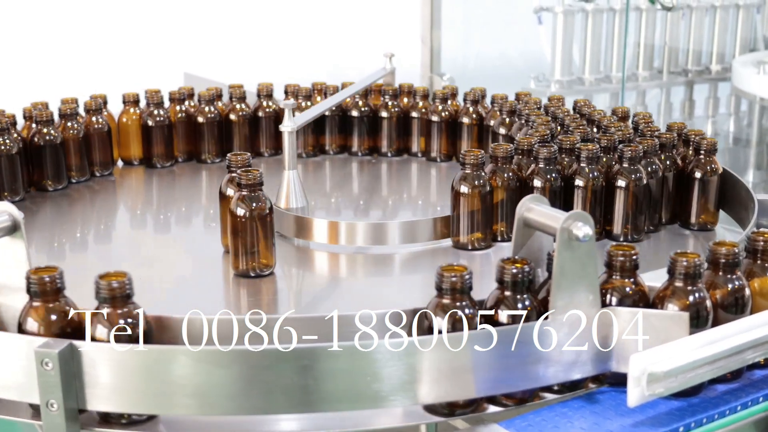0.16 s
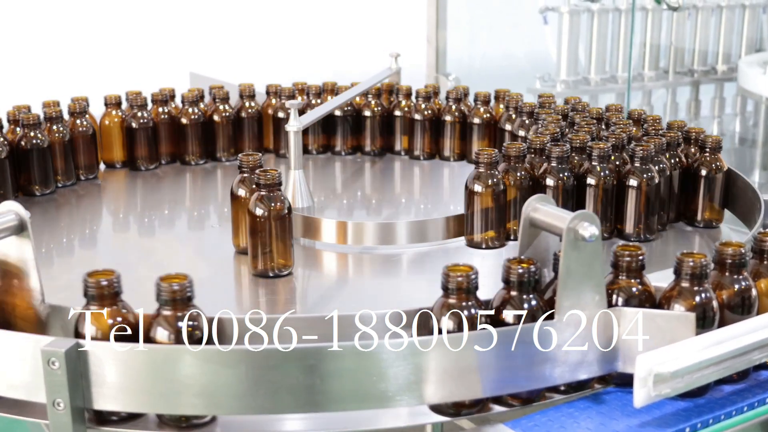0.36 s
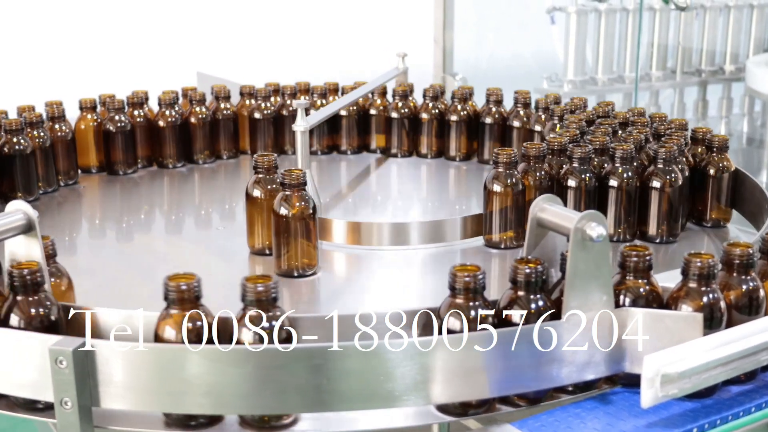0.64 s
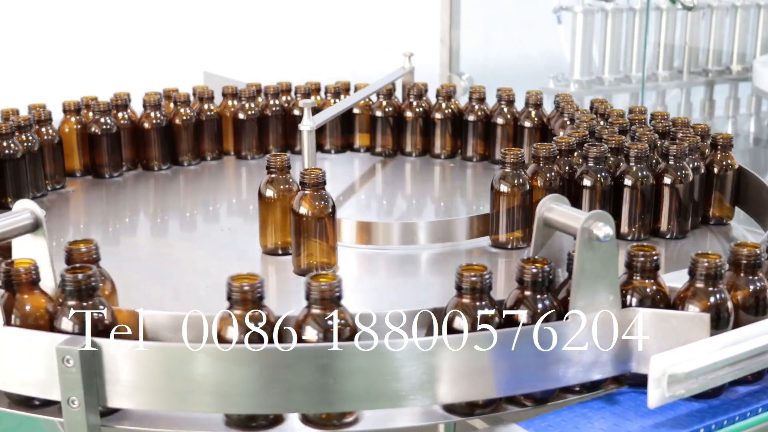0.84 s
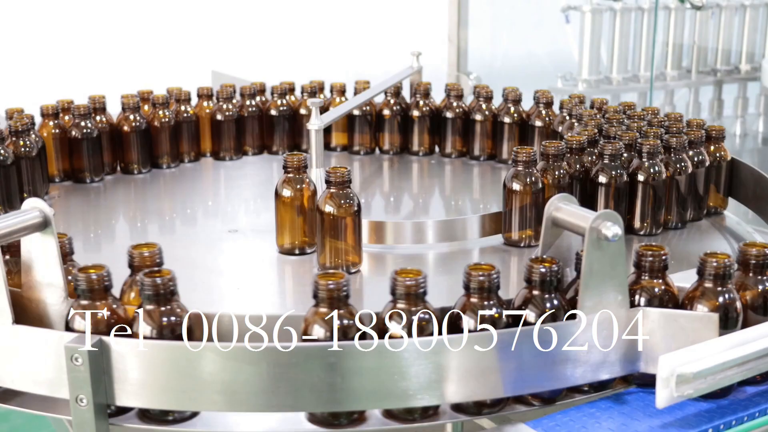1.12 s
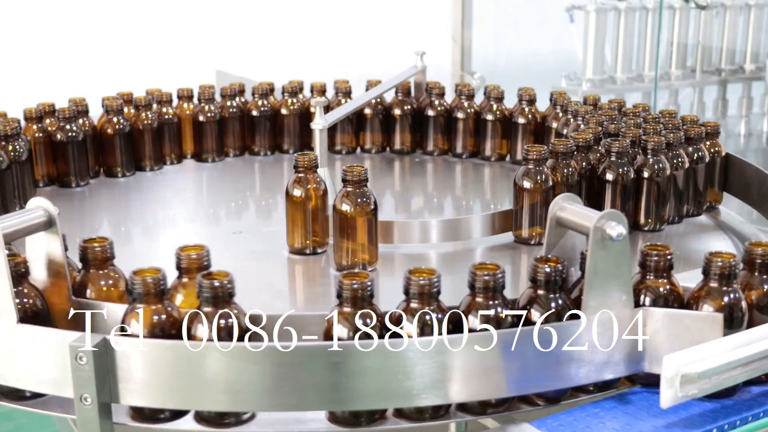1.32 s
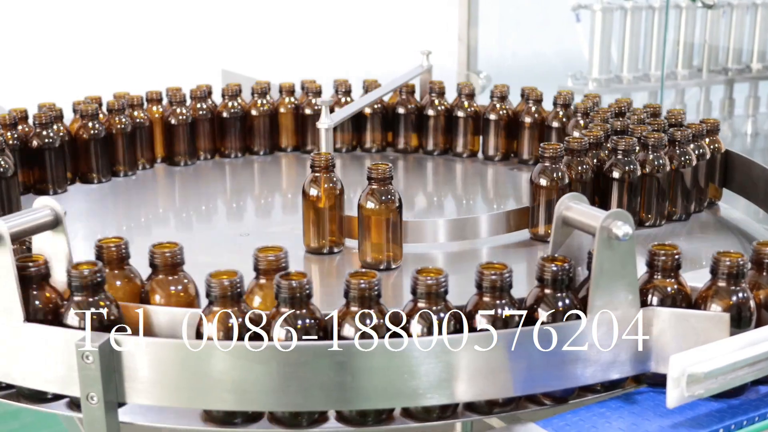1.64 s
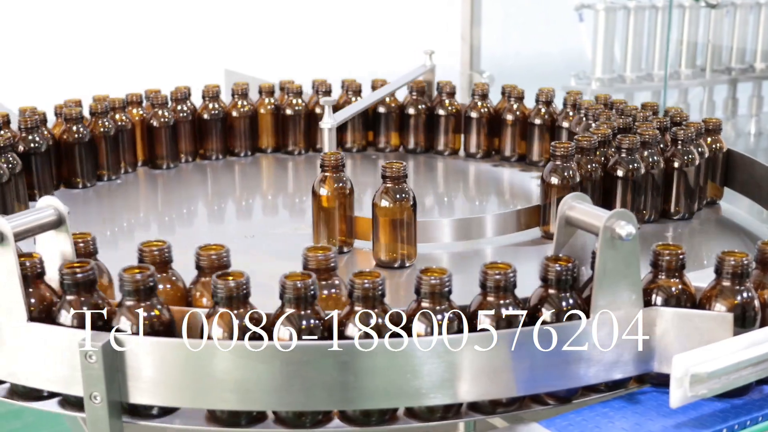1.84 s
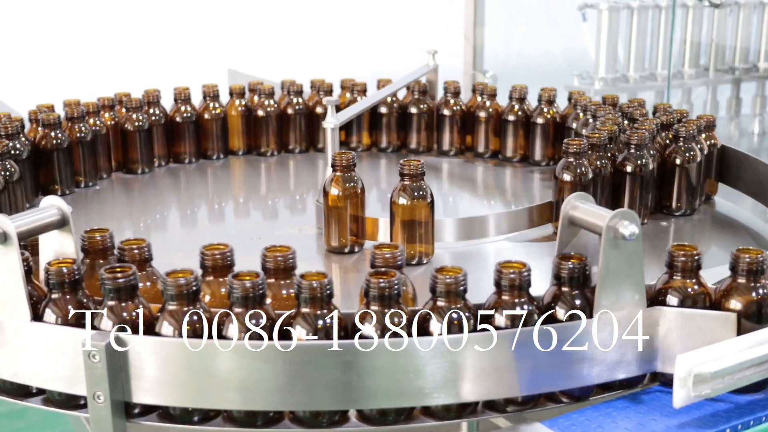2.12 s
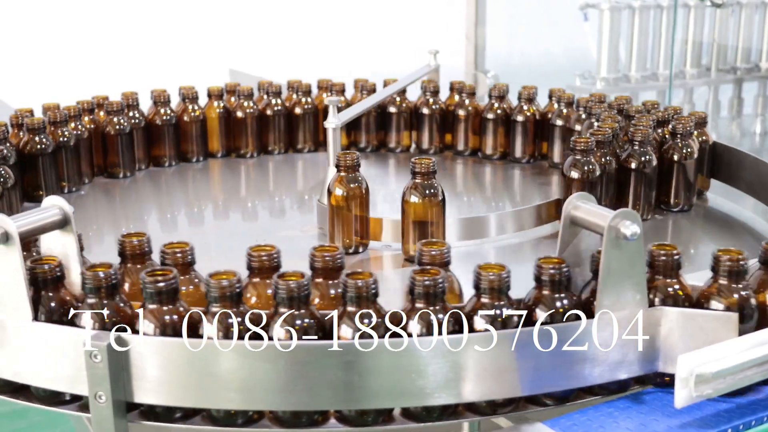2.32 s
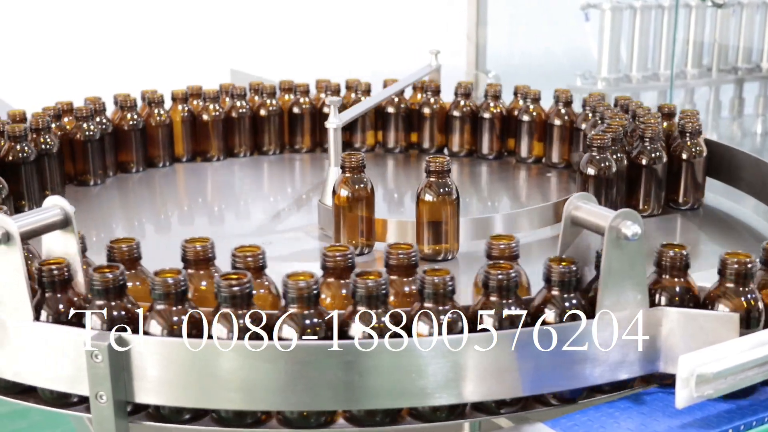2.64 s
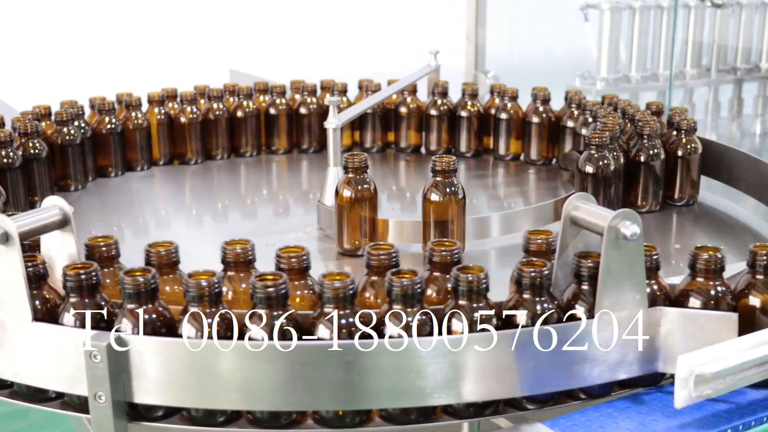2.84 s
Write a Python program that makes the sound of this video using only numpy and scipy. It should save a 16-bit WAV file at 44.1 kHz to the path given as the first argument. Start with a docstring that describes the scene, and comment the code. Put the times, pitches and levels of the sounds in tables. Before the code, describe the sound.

Small glass bottles rattle and clack in irregular bursts on a steel turntable, with sharp single knocks and brief glassy ringing, heard close in stereo over a steady machine rush in a reverberant factory hall.

```python
"""A rattle and a glassy knock open the scene over faint low noise, and one bottle rings on faintly.
Small glass bottles crowd on the steel turntable of a bottling line, close by in a factory hall.
Each shove is a rattle of random contacts: the steel clatters, the bottles clack and their walls ring.
Single knocks, built from damped modes, stand out; under them the pack jostles all the time.
Behind it lie filtered-noise rush, faint deep noise, the humming lines of the drive and one rising groan."""
import sys
import numpy as np
from scipy import signal
from scipy.fft import rfft, irfft
from scipy.io import wavfile
from scipy.ndimage import uniform_filter1d

SR = 44100
rng = np.random.default_rng(int(sys.argv[2]) if len(sys.argv) > 2 else 0)


def to_wav(sig):
    """Store sig (one row per channel, or 1-D mono) as 16-bit WAV at the path in sys.argv[1].

    Samples outside -1..1 are clipped; the rate is SR.
    """
    pcm = np.clip(np.atleast_2d(sig), -1, 1) * 32767
    pcm = np.round(pcm).astype(np.int16)
    wavfile.write(sys.argv[1], SR, pcm.T)  # frames by channels


N = 130977

# Coloured noise of the hall's machines and the faint low noise: (frequency [Hz], relative density [dB per Hz])
HALL_SPECTRUM = [(70, -57), (115, -16.5), (170, -4), (260, 2.5), (370, -6.5), (600, -2.5), (1300, 8.5),
                 (3000, -1.5), (8000, -20.5), (15000, -48)]
LOW_NOISE_SPECTRUM = [(25, -20), (60, 1), (105, 14), (220, -10)]
# Lines of the drive: (frequency [Hz], mean level [dB])
HUM_LINES = [(233, -59), (322, -58), (445, -58)]
# Course of the groan: (time [s], centre pitch [Hz], level [dB])
GROAN_COURSE = [(.42, 165, -59), (.5, 168, -40), (.54, 177.5, -43), (.58, 203, -38), (.63, 213, -67)]
# Spans in which the faint low noise is present: (time [s], length [s])
LOW_NOISE_SPANS = [(0, .5), (.79, .04), (1.04, .12), (1.235, 0.58), (1.962, 0.21), (2.39, 0.37)]
# Single hard knocks: (time [s], level [dB], pitch [Hz])
KNOCKS = [(.018, -8, 1790), (0.2049, -11, 1210), (0.2095, -3, 1400), (0.2091, -5, 2200), (.2128, -6, 2850),
          (0.52, -8, 2440), (.859, -9, 2180), (.913, -7, 2020), (1.173, -8, 2700), (1.3485, -7, 2554),
          (1.4033, -12, 2560), (1.611, -12, 1670), (1.8043, -5, 1990), (1.8437, -4.5, 2430),
          (2.2082, -4.5, 2440), (2.212, -8.5, 2800), (2.2562, -5, 2820), (2.265, -2, 2710),
          (2.3282, -11, 2640), (2.346, -10, 2720), (2.5646, -10, 2085), (2.6053, -4.5, 2740),
          (2.609, -1, 2490), (2.7393, -12, 2750), (2.773, -8, 2880), (2.8945, -2, 2730), (2.903, -7, 2840)]
# Modes of a knock: (multiple of its pitch [ratio], level against the knock [dB], t60 [s])
KNOCK_MODES = [(.56, -10.5, 0.016), (.78, -9, 0.019), (0.999, 1.5, 0.015), (1.082, -14.5, 0.066)]
# Shoves through the pack:
# (time [s], length [s], steel level [dB], clack against steel [dB], glass ring against steel [dB])
SHOVES = [(0.007, 0.0078, -29.5, 6, 3), (0.079, 0.048, -27, -3, -7.5), (0.193, 0.028, -23, -5, 3.5),
          (0.235, 0.085, -24, -1, -7), (0.332, 0.062, -25, -7, -9), (0.491, 0.058, -17.5, -5, -1.5),
          (0.566, 0.05, -23, -2, -0.5), (0.656, 0.051, -22.5, -2, -6.5), (0.717, 0.04, -23.5, -5, -1.5),
          (0.787, 0.086, -24.5, -11, -7.5), (0.849, 0.037, -21.5, -2, -0.5),
          (0.892, 0.061, -22.5, -2.5, -0.5), (0.982, 0.09, -28.5, -5.5, -5), (1.089, 0.057, -31, -0.5, 1.5),
          (1.158, 0.048, -23.5, -0.5, -8.5), (1.227, 0.016, -27, -22, -8), (1.395, .012, -29, 2.5, 2),
          (1.427, 0.022, -22.5, 0.5, -2), (1.518, 0.018, -27.5, 1, -5), (1.798, 0.039, -23, 2, 1.5),
          (1.889, 0.025, -25.5, 2, -3.5), (2.03, 0.038, -24.5, -2.5, -0.5), (2.091, 0.06, -23.5, -6, -3.5),
          (2.165, 0.041, -23.5, -4, 0), (2.2, 0.006, -24, 5, 8), (2.243, 0.026, -26, 6, 2),
          (2.451, 0.023, -36.5, 7, -3), (2.485, 0.09, -30.5, -2.5, -4.5), (2.593, 0.045, -24, 1.5, 0.5),
          (2.663, 0.032, -37.5, 7, -11), (2.722, 0.053, -27, 3.5, -3), (2.818, 0.07, -27.5, -3.5, -1.5),
          (2.877, 0.014, -30, 10, 4.5)]
# Wall modes of a typical bottle: (frequency [Hz], relative level [dB], t60 [s])
WALL_MODES = [(5520, -9, 0.079), (7380, -3.5, 0.033), (7514, -3, 0.055), (9060, -12.5, 0.21),
              (9720, -7.5, 0.026), (10250, -11, 0.13)]
# Steel table, clack of two bottles, tick of contact: (frequency [Hz], relative density [dB per Hz])
STEEL_SPECTRUM = [(80, -73), (170, -26.5), (400, -16.5), (760, -11.5), (950, -5.5), (1250, 1), (1650, 0.6),
                  (2200, -4.5), (4000, -19), (15000, -49)]
CLACK_SPECTRUM = [(200, -68), (1200, -17), (1900, -4), (2450, 1), (2820, 1.5), (3350, -5), (4600, -15.5),
                  (8000, -18), (15000, -64)]
TICK_SPECTRUM = [(1000, -57), (3500, 4), (5500, 2.5), (8300, 3.5), (10000, 0), (12000, -0.5), (15500, -5)]

HALL_DB, LOW_NOISE_DB = -33.5, -59
PING_S, PING_DB, PING_HZ, PING_T60_S = 0.014, -26, 5150, 0.13
BOTTLE_COUNT, NEIGHBOUR_COUNT = 20, 6
SIZE_SPREAD = 0.0149  # spread of wall pitch between bottles, as a fraction
TRAVEL_BOTTLES_PER_S = 24  # how fast the group in contact moves round the pack
CONTACTS_PER_S, CONTACT_SCATTER_DB = 1400, 2
RISE_S, RELEASE_S = 0.0094, 0.042  # steel and clack
RING_RISE_S, RING_RELEASE_S = 0.016, 0.016
JOSTLE_DB, JOSTLE_CLACK_DB, JOSTLE_RING_DB, JOSTLE_WALK_DB = -33, -38.5, -44, 1.7
HARD_DB, HARDENING = -25, 0.56  # contacts stronger than this tick more sharply, by this power
STEEL_T60_S, CLACK_T60_S, TICK_T60_S, CRACK_T60_S = 0.018, 0.024, 0.004, 0.0049
RING_DB, TICK_DB, CRACK_DB = -2, -5.5, -15  # balance of the layers
# side against mid [ratio]
STEEL_WIDTH, CLACK_WIDTH, TICK_WIDTH, KNOCK_WIDTH, HALL_WIDTH = 0.077, 0.96, 1, 0.44, 0.17
PAN_DB = -2  # left against right
ROOM_DB, ROOM_T60_S = -5.5, 0.57
TOP_HZ = 15800
SIDES = np.array([[1], [-1]])  # left, right


def undb(db):
    """Amplitude for a level in dB."""
    return 10 ** (np.asarray(db) / 20)


def unit(x):
    """Scale to an energy of 1 in each channel."""
    return x / np.sqrt(np.sum(x ** 2, axis=-1, keepdims=True))


def fade(t60):
    """A quarter second of exponential decay that loses 60 dB in t60 seconds."""
    return np.exp(-np.log(1000) * np.arange(SR // 4) / SR / t60)


def colour(x, points):
    """Causal minimum-phase filter through (Hz, dB) points, by folding the cepstrum."""
    size = 2 * x.shape[-1]
    hz, db = np.array(points, float).T
    log_bins = np.log(np.fft.rfftfreq(size, 1 / SR) + 1)
    cepstrum = irfft(np.log(undb(np.interp(log_bins, np.log(hz), db))))
    cepstrum[1:size // 2] *= 2
    cepstrum[size // 2 + 1:] = 0
    return irfft(rfft(x, size) * np.exp(rfft(cepstrum)))[..., :size // 2]


def stereo(pair, width):
    """Left and right from a mid and a side signal."""
    return pair[0] + width * pair[1] * SIDES


def through(x, response):
    """Convolve with a two-channel response."""
    return signal.fftconvolve(np.atleast_2d(x), response, axes=-1)[:, :N]


def walk(rate):
    """Slow random wander with a spread near 1: held values, rate per second, joined by ramps."""
    hold = int(SR / rate)
    values = rng.standard_normal(256)[np.arange(N // hold + 1) % 256]
    return np.sqrt(2) * uniform_filter1d(np.repeat(values, hold), hold)[:N]


def steady_noise(spectrum, width):
    """Coloured stereo noise whose mid has an rms of 1."""
    pair = unit(colour(rng.standard_normal((2, N)), spectrum))
    return stereo(pair, width) * np.sqrt(N)


def burst(spectrum, t60, width):
    """Response of many crowded, quickly dying modes to one contact."""
    dying = rng.standard_normal((2, SR // 4)) * fade(t60)
    return stereo(unit(colour(dying, spectrum)), width)


def hall_rush():
    """The rush of the machines in the hall: coloured noise of wandering level."""
    return steady_noise(HALL_SPECTRUM, HALL_WIDTH) * undb(HALL_DB + 1.2 * walk(8.24))


def drive_hum():
    """The drive hums on a few sine lines that waver in level and phase."""
    t = np.arange(N) / SR
    hum = 0
    for hz, db in HUM_LINES:
        level = np.sqrt(2) * undb(db + 3.1 * walk(7.4))  # dB of rms
        hum = hum + level * np.sin(2 * np.pi * hz * t + 0.5 * walk(15))
    return hum


def low_noise():
    """Faint deep noise of wandering level, present in some spans and absent in others."""
    t = np.arange(N) / SR
    low = steady_noise(LOW_NOISE_SPECTRUM, 0.42)
    spans = sum(1. * ((t >= start) & (t < start + length)) for start, length in LOW_NOISE_SPANS)
    gate = uniform_filter1d(spans, size=1300)  # soft edges
    return low * undb(LOW_NOISE_DB + 4.7 * walk(18)) * gate


def groan():
    """A short low groan, an unsteady sine rising in pitch, as of a guide rail rubbed under load."""
    t = np.arange(N) / SR
    at, hz, db = np.array(GROAN_COURSE).T
    pitch = np.interp(t, at, hz) * (1 + 0.061 * walk(58.3))
    phase = 2 * np.pi * np.cumsum(pitch) / SR
    return undb(np.interp(t, at, db, left=-120, right=-120)) * np.sin(phase)


def ping():
    """One bottle stands free after a contact and a wall mode rings on faintly."""
    age = np.maximum(np.arange(N) / SR - PING_S, 0)
    ring = np.exp(-np.log(1000) * age / PING_T60_S) * np.sin(2 * np.pi * PING_HZ * age)
    return undb(PING_DB) * ring


def knocks():
    """Hard single blows: a crack and a few quickly damped modes around each one's own pitch."""
    out = np.zeros((2, N + SR))
    age = np.arange(SR // 4) / SR
    for start, db, pitch in KNOCKS:
        onset_scale = np.sqrt(SR * CRACK_T60_S / np.log(1000))  # from unit energy to level at the onset
        blow = undb(CRACK_DB) * burst(CLACK_SPECTRUM, CRACK_T60_S, KNOCK_WIDTH) * onset_scale
        for ratio, mode_db, t60 in KNOCK_MODES:
            hz = pitch * ratio
            phase = KNOCK_WIDTH * rng.standard_normal() * SIDES
            envelope = fade(t60) * (1 - fade(0.0033))  # a soft onset
            swing = envelope * np.sin(2 * np.pi * hz * age + phase)
            speed = np.gradient(swing, axis=-1) * SR / (2 * np.pi * hz)  # the wall's speed radiates
            blow = blow + undb(mode_db) * speed
        i = int(start * SR)
        out[:, i:i + len(age)] += undb(db) * blow
    return out[:, :N]


def glass():
    """One bottle's wall modes, a little off those of its neighbours."""
    ring = 0
    for hz, db, t60 in WALL_MODES:
        envelope = fade(t60)
        own_hz = hz * (1 + SIZE_SPREAD * rng.standard_normal())
        cycles = own_hz * np.arange(len(envelope)) / SR
        swing = envelope * np.sin(2 * np.pi * (cycles + rng.random((2, 1))))
        ring = ring + undb(db) * unit(np.diff(swing, prepend=0))  # the wall's speed radiates
    return undb(RING_DB) * unit(ring)


def force(levels_db, rest_db, rise, release):
    """Strength of the contacts: each shove rises, holds and dies away over the constant jostling."""
    t = np.arange(N) / SR
    power = undb(rest_db + JOSTLE_WALK_DB * walk(9.1)) ** 2
    for (start, length, *_), db in zip(SHOVES, levels_db):
        attack = np.clip((t - start) / rise, 0, 1)
        decay = np.exp(-np.maximum(t - start - length, 0) / release)
        power = power + (undb(db) * attack * decay) ** 2
    return np.sqrt(power)


def contacts():
    """Random single-sample hits of either sign, evened out so that they share the shove's energy."""
    struck = rng.random(N) < CONTACTS_PER_S / SR
    strength = undb(CONTACT_SCATTER_DB * rng.standard_normal(N))
    hits = struck * strength * rng.choice([-1, 1], N)
    return hits / np.sqrt(uniform_filter1d(hits ** 2, size=700) + 1e-6)


def pack():
    """Random contacts, shared out among the bottles, excite steel, clack and glass together."""
    _, _, db, clack_db, ring_db = np.array(SHOVES).T
    steel = force(db, JOSTLE_DB, RISE_S, RELEASE_S)
    clack = force(db + clack_db, JOSTLE_CLACK_DB, RISE_S, RELEASE_S)
    ring = force(db + ring_db, JOSTLE_RING_DB, RING_RISE_S, RING_RELEASE_S)
    tick = undb(TICK_DB) * ring * (ring / undb(HARD_DB)) ** HARDENING
    hits = contacts()
    # only a few neighbours touch at a time
    front = (TRAVEL_BOTTLES_PER_S * np.arange(N) / SR).astype(int)
    owner = (front + rng.integers(0, NEIGHBOUR_COUNT, N)) % BOTTLE_COUNT
    out = 0
    for bottle in range(BOTTLE_COUNT):
        own = hits * (owner == bottle)
        out = out + through(own * steel, burst(STEEL_SPECTRUM, STEEL_T60_S, STEEL_WIDTH))
        out = out + through(own * clack, burst(CLACK_SPECTRUM, CLACK_T60_S, CLACK_WIDTH))
        out = out + through(own * ring, glass())
        out = out + through(own * tick, burst(TICK_SPECTRUM, TICK_T60_S, TICK_WIDTH))
    return out


def room(source):
    """The hall's answer: a diffuse noise tail that swells briefly, then decays for a quarter second."""
    tail = fade(ROOM_T60_S)
    response = unit(rng.standard_normal((2, len(tail))) * tail * (1 - fade(0.016)))
    return undb(ROOM_DB) * through(source, response)


def scene():
    """The bottles lie a little to the right; the hall answers them."""
    pan = undb(PAN_DB * SIDES / 2)
    bottles = (pack() + knocks() + ping()) * pan
    background = hall_rush() + drive_hum() + low_noise() + groan()
    return bottles + room(bottles) + background


def record(dry):
    """Peaks near full scale are rounded and a steep low-pass cuts the top."""
    rounded = dry / (1 + dry ** 6) ** (1 / 6)
    low_pass = signal.ellip(12, .2, 100, TOP_HZ, fs=SR, output="sos")
    return signal.sosfilt(low_pass, rounded)


dry = scene()
out = record(dry)
to_wav(out)
```